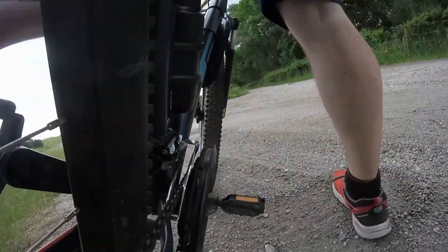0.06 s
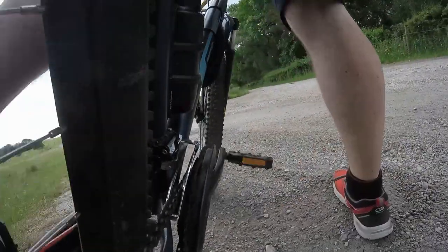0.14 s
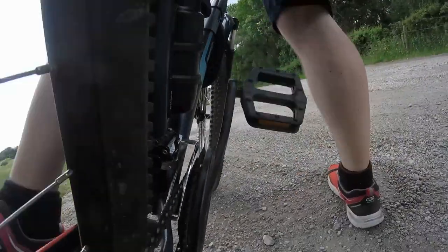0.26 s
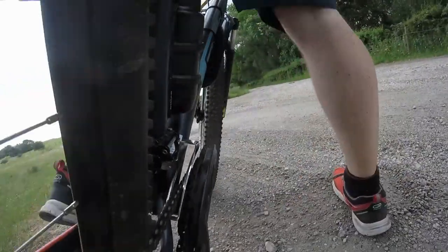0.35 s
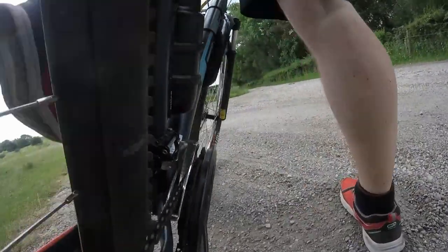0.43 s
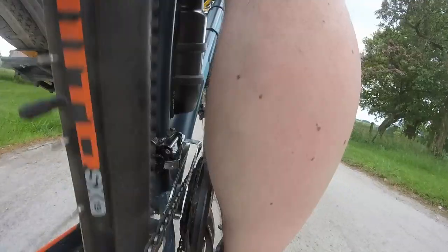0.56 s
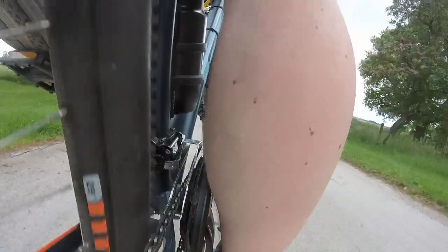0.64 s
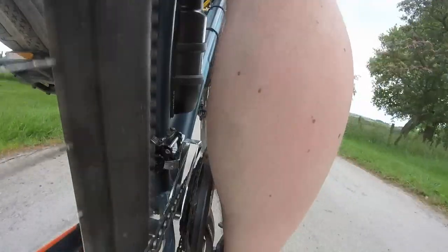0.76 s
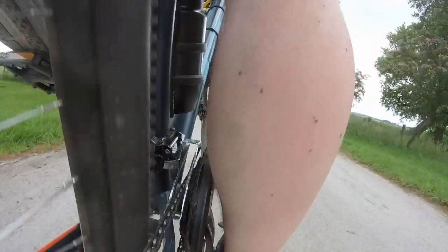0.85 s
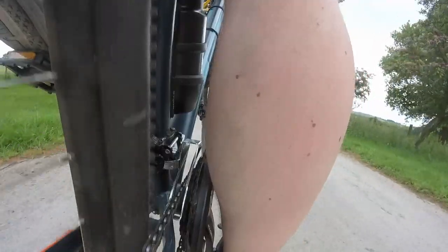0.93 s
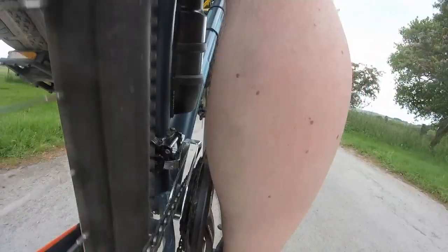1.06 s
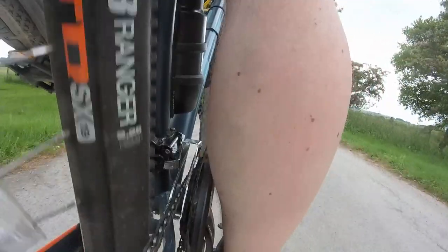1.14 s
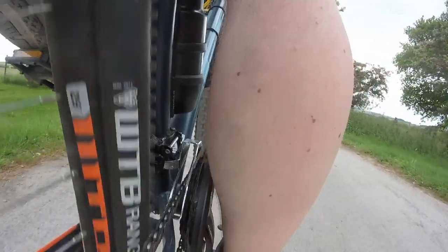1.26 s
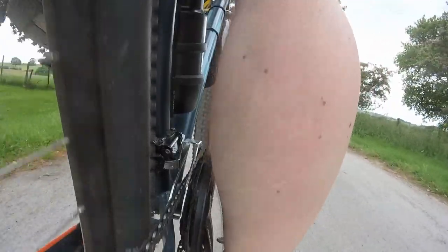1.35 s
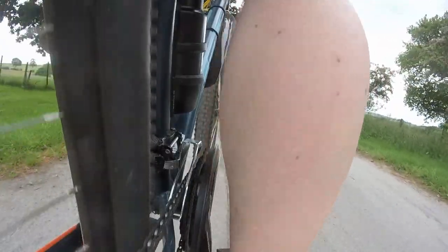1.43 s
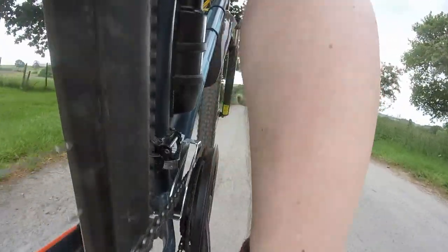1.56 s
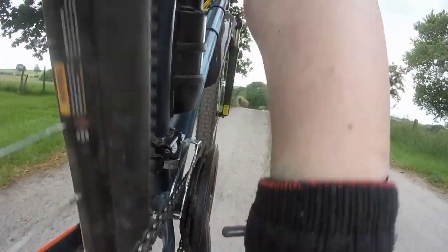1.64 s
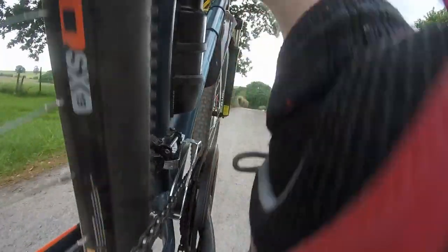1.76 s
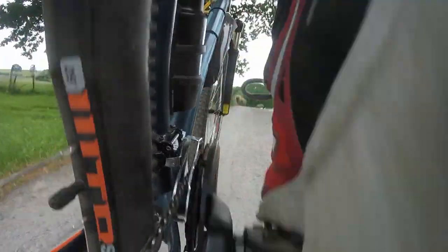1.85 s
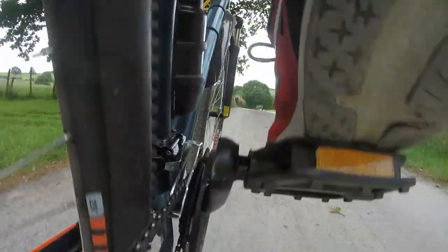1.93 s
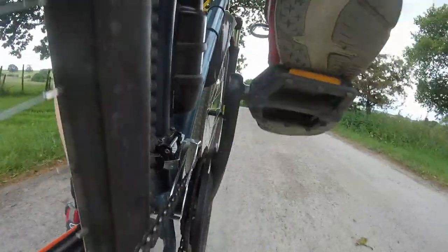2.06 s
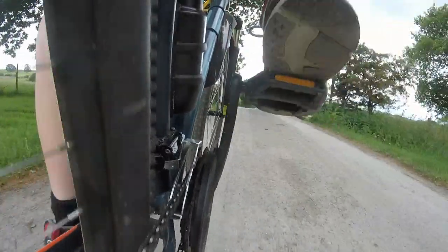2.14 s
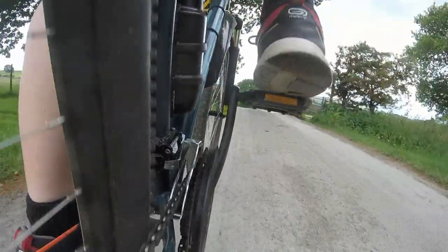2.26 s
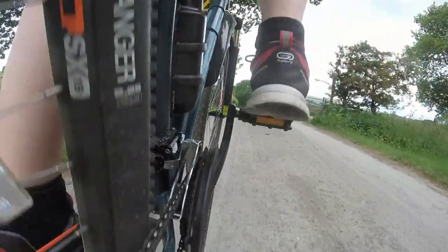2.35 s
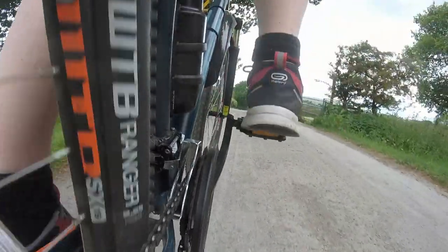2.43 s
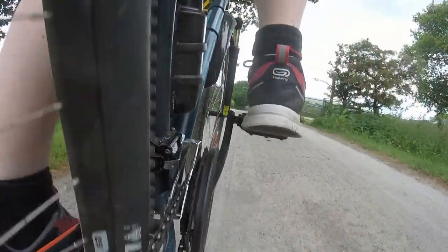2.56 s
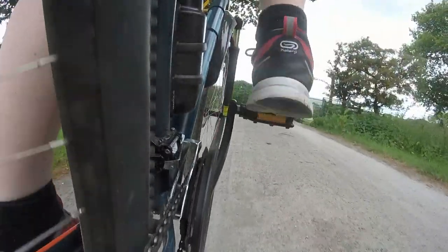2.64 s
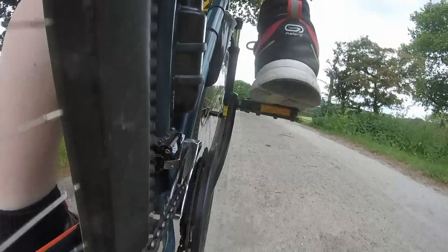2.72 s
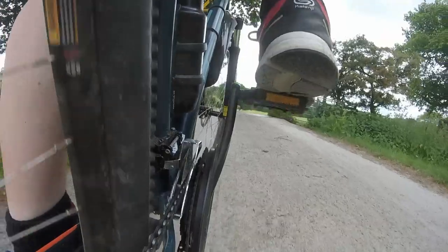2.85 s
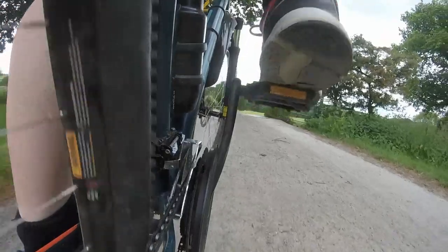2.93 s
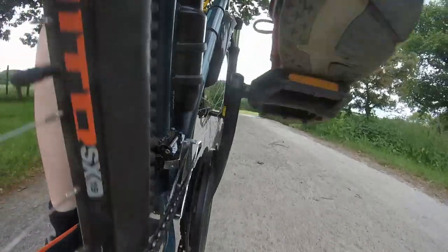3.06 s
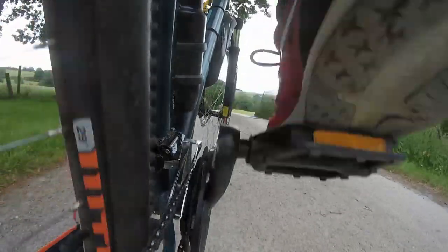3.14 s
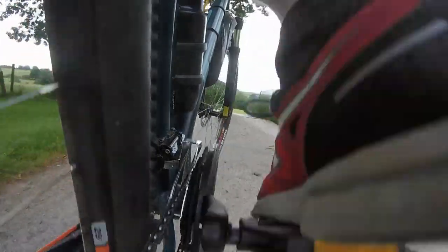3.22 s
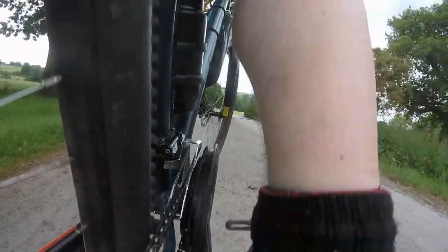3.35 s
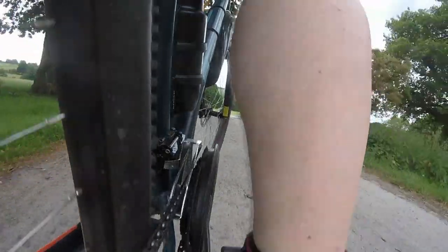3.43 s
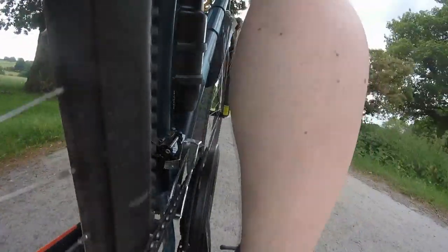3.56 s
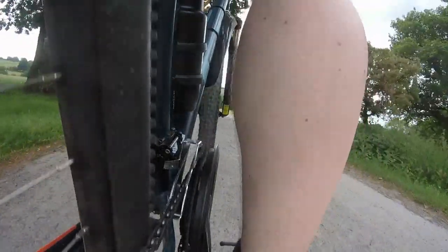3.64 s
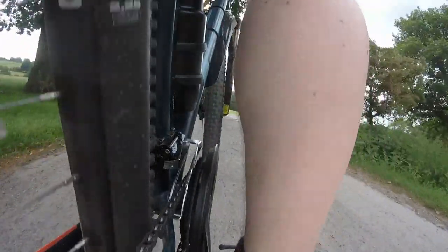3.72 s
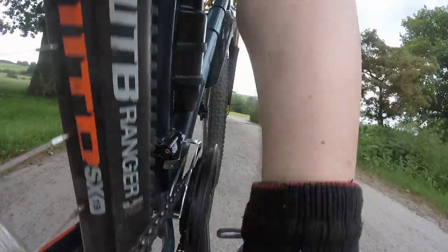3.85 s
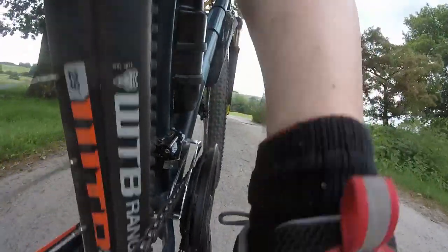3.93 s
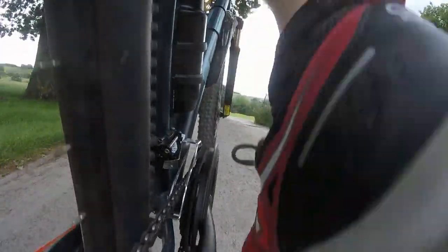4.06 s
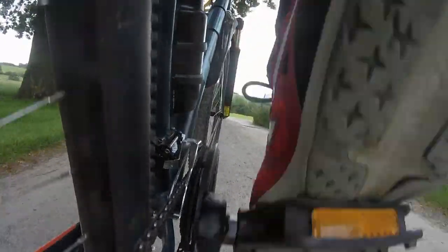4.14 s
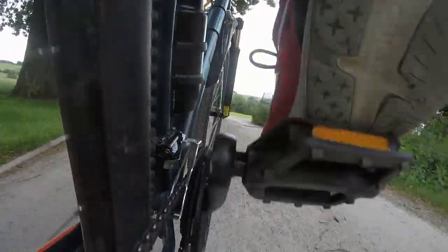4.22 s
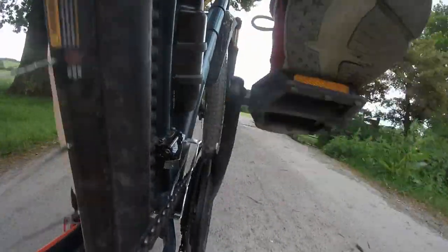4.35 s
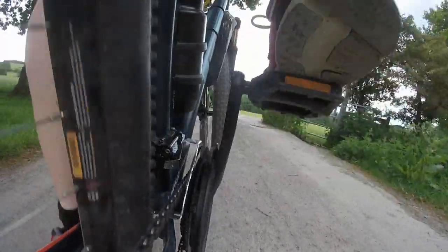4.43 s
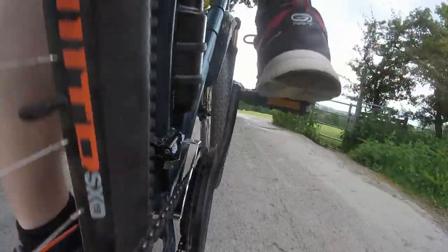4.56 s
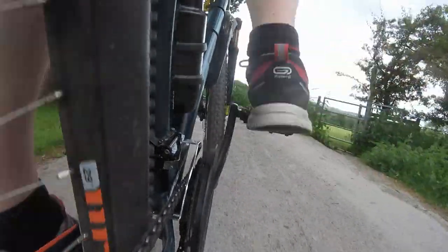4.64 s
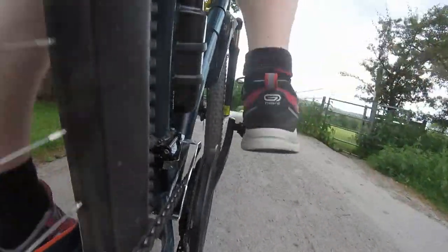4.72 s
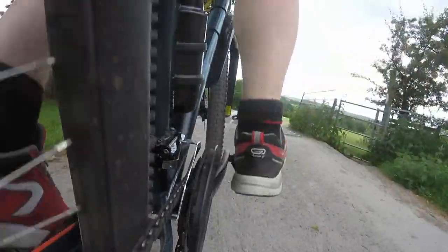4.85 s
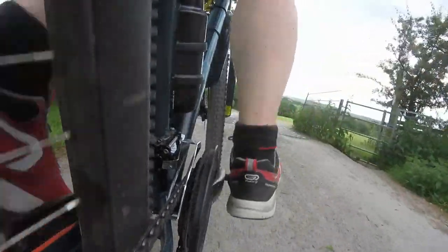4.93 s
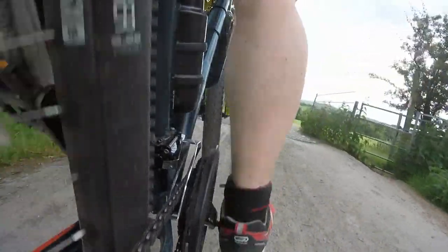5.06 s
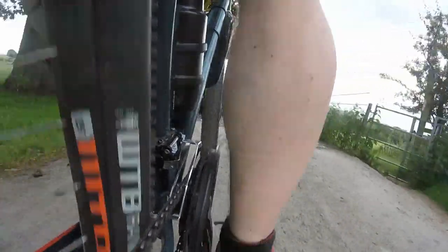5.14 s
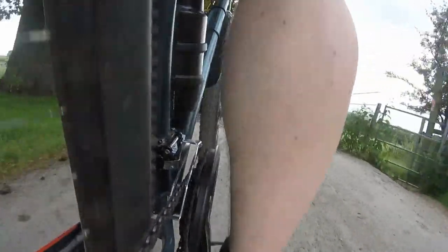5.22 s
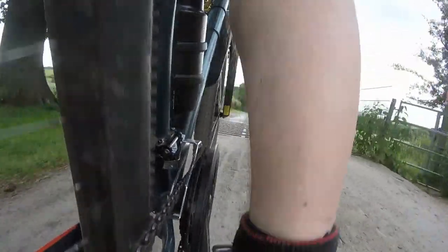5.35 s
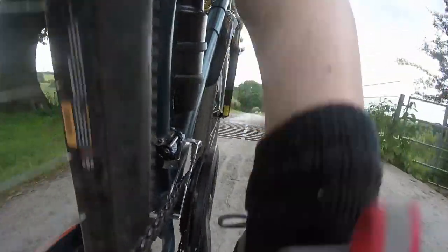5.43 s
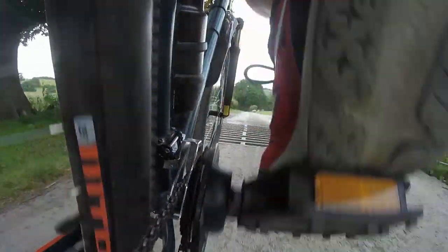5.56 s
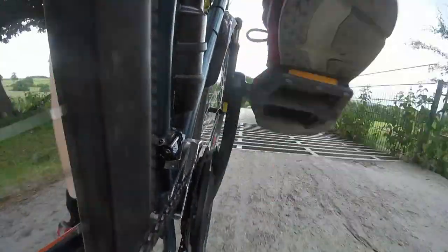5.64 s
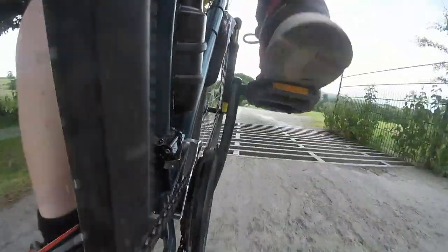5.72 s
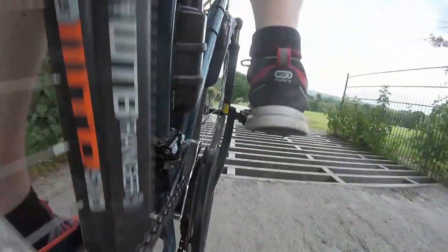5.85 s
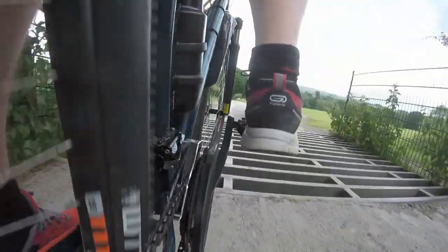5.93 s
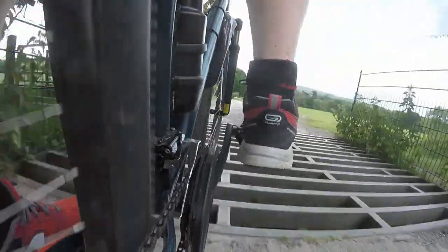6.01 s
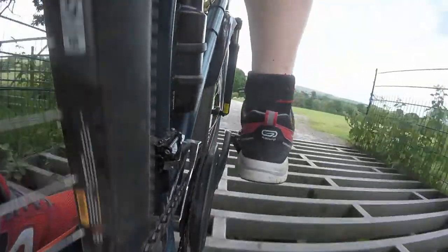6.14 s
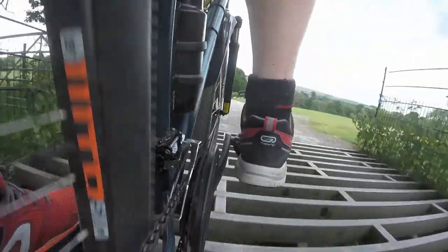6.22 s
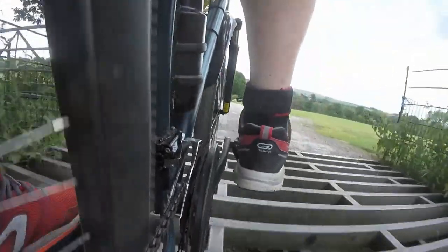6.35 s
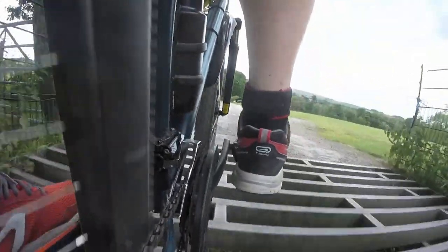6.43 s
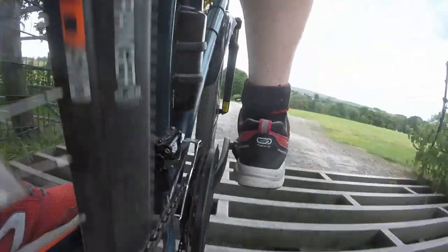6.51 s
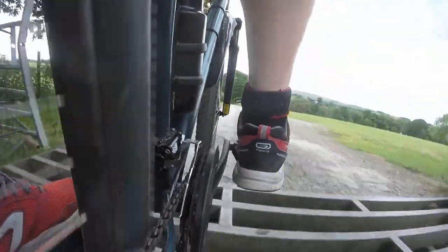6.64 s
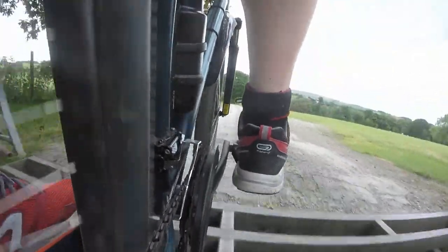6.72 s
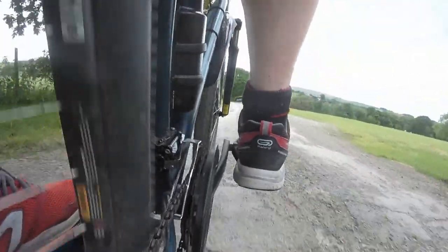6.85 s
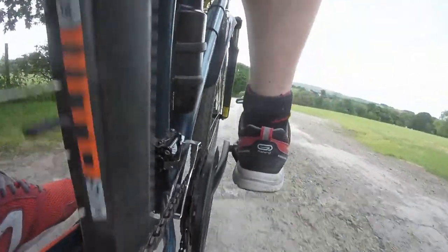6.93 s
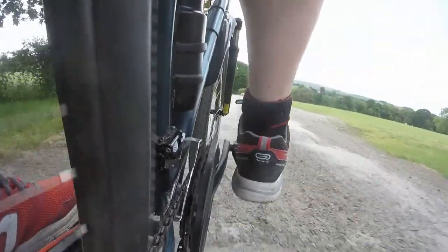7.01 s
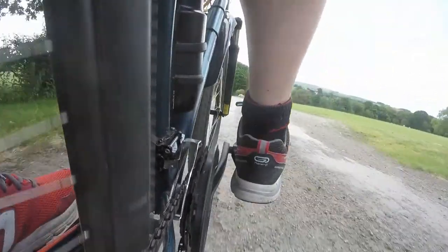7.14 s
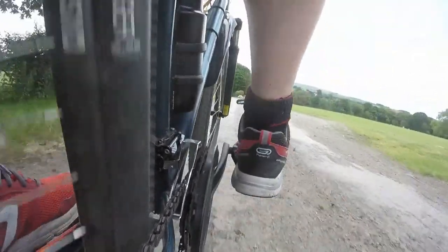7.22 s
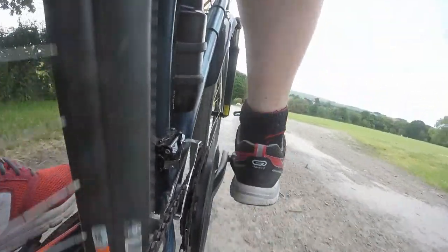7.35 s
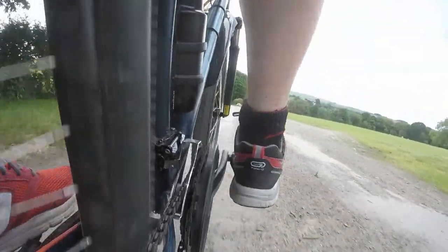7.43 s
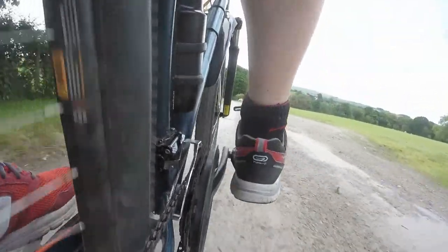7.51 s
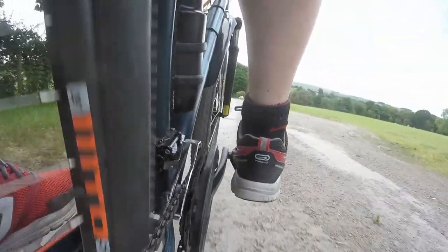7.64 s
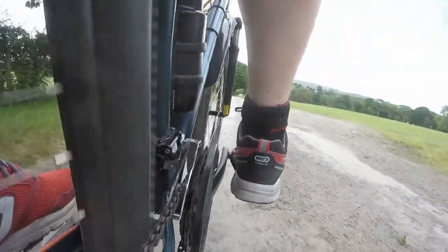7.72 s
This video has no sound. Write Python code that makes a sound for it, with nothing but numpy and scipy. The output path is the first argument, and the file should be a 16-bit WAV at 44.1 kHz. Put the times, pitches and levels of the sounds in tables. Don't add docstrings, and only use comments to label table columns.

```python
import sys
import numpy as np
from scipy import signal
from scipy.fft import rfft, irfft, next_fast_len
from scipy.io import wavfile
from scipy.ndimage import uniform_filter1d

SR = 44100
rng = np.random.default_rng(int(sys.argv[2]) if len(sys.argv) > 2 else 0)


def to_linear_factor(level_db):
    exponent = np.asarray(level_db, float) / 20
    return 10 ** exponent


def int16_out(signal):
    q = np.round(np.clip(np.atleast_2d(signal).T, -1, 1) * 32767)
    wavfile.write(sys.argv[1], SR, q.astype(np.int16))


N = 343098


def evened(x):
    return x / np.sqrt(np.mean(x ** 2) + 1e-20)


def add(mix, s, sound):
    part = mix[round(s * SR):][:len(sound)]
    part += sound[:len(part)]


def coloured(x, points):
    size = next_fast_len(N + 4096)
    hz, db = np.transpose(points)
    bins_hz = np.fft.rfftfreq(size, 1 / SR)
    gain = to_linear_factor(np.interp(np.log(bins_hz + 1), np.log(hz), db, -90, -90))
    return irfft(rfft(x, size) * gain, size)[:N]


def resonate(x, modes):
    out = 0
    for k, (hz, width, db) in enumerate(modes):
        r = np.exp(-np.pi * width / SR)
        poles = [1, -2 * r * np.cos(2 * np.pi * hz / SR), r * r]
        out = out + (-1) ** k * to_linear_factor(db) * signal.lfilter([1 - r, 0, r - 1], poles, x)
    return out


def bumps(per_s, uneven_db, long_s):
    size = to_linear_factor(uneven_db * np.minimum(rng.exponential(1, N), 4))
    jolts = size * (rng.random(N) < per_s / SR)
    power = signal.lfilter([1], [1, -np.exp(-2 / (long_s * SR))], jolts ** 2)
    return np.sqrt(evened(abs(power)))


# (time [s], rocking of the mount [dB], roll of the wheels [dB])
RIDE = [(0.0, -72, -74.5), (0.5, -69.5, -67), (0.62, -51.5, -64.5), (1.2, -52, -66), (1.55, -55.5, -64.5),
        (1.75, -55, -60), (2.15, -57, -63.5), (3.1, -53.5, -66.5), (3.5, -61, -57.5), (3.75, -65.5, -68),
        (4.35, -51, -62), (4.7, -54, -62), (5.1, -46, -55), (5.65, -56.5, -58), (6.058, -52.5, -57.5),
        (6.078, -51.5, -54), (6.9, -50, -53), (7.35, -60, -57.5)]
# (time [s], length [s], rocking [dB], roll [dB])
ROUGH_PATCHES = [(0.136, 0.12, 7, 3.5), (0.332, 0.1, -3, 6), (0.945, 0.11, 2.5, -2), (1.982, 0.12, 11, 1.5),
                 (2.678, 0.17, 7.5, 0), (3.548, 0.11, 3.5, 3), (4.185, 0.1, 3, 4), (4.42, 0.16, 3, 0),
                 (4.93, 0.29, -1, -0.5), (3.414, 0.16, 4.5, -1), (5.15, 0.22, 2.5, 2),
                 (5.553, 0.143, 1.5, 3), (5.696, 0.16, 6.5, 5), (6.492, 0.063, 6.5, 4),
                 (6.842, 0.078, 0, 5.5), (7.138, 0.16, 2, 3), (7.414, 0.32, 4, 2.5)]


def road(rock_share, roll_share, level_db, coast_db=0):
    t = np.arange(N) / SR
    s, rock_db, roll_db = np.transpose(RIDE)
    rock = np.interp(t, s, rock_db + 55)
    roll = np.interp(t, s, roll_db + 62)
    for start, length, more_rock_db, more_roll_db in ROUGH_PATCHES:
        shape = signal.windows.tukey(round(length * SR), .25)
        add(rock, start, more_rock_db * shape)
        add(roll, start, more_roll_db * shape)
    coasting = np.clip((t - 6.07) / 0.0081, 0, 1)
    return to_linear_factor(rock_share * rock + roll_share * roll + level_db + coast_db * coasting)


# (frequency [Hz], density [dB per Hz])
MOUNT_SPECTRUM = [(8.8, -36), (15, -1), (48, -0.5), (130, -7), (200, -30), (260, -27.5), (440, -120)]


def mount_shake():
    drive = (.5 + bumps(12, 2.6, 0.057)) * rng.standard_normal(N)
    return road(0.96, 0.001, -52.5) * evened(coloured(drive, MOUNT_SPECTRUM))


# (time [s], peak [dB], swing [Hz], negative swings down first)
WHEEL_HITS = [(0.682, -43, 184), (0.687, -45, 37), (1.989, -27, -42), (2.053, -31.5, 68),
              (2.724, -31.5, 38.5), (4.182, -37, 55.5), (4.673, -37.5, 54), (4.751, -35, 53.5),
              (4.943, -37, 35.5), (4.951, -39, 44), (5.722, -36, 86.5), (6.081, -31.5, 63.5),
              (6.4807, -19.5, 163), (7.132, -27, -170), (5.8, -36.5, 265), (6.606, -25, -190),
              (6.875, -28, 195), (4.966, -32, -62), (.712, -36, 55)]


def thumps():
    out, t = np.zeros(N), np.arange(9000) / SR
    for s, db, hz in WHEEL_HITS:
        swing = np.sin(2 * np.pi * hz * t) * np.exp(-t * abs(hz) / 4.1)
        add(out, s, to_linear_factor(db - 8.5) * swing)
    return out


def mount_sag():
    out, t = np.zeros(N), np.arange(9000) / SR
    hz = 70 + (360 - 70) * np.exp(-t / 0.034)
    swing = np.sin(2 * np.pi * np.cumsum(hz) / SR)
    add(out, 3.95, to_linear_factor(-51.5) * swing * np.exp(-(t / .08) ** 2))
    return out


# (frequency [Hz], width [Hz], level [dB])
TYRE_MODES = [(152, 91, -4.5), (210.3, 40.7, 1), (235.6, 41, -3), (330.6, 91, -6.5), (421, 510, -17)]


def tyre():
    drive = (0.82 + bumps(60, 3.5, 0.01)) * rng.standard_normal(N)
    carcass = resonate(drive, [(199.4, 250, 0)])
    return road(0.64, 0.39, -58.5, coast_db=8.5) * evened(resonate(carcass, TYRE_MODES))


# (frequency [Hz], width [Hz], level [dB])
TUBE_MODES = [(437.5, 29.6, 5), (550, 74, -1.5), (658, 57, 2), (734, 17, 3), (825, 91, -3),
              (989.5, 77.5, -2), (1124, 24, -6), (1245, 67, -7), (1615, 60, -15.5), (2126, 1030, -23),
              (2530, 1060, -23.5), (3140, 370, -20)]


def frame_buzz():
    drive = (0.59 + bumps(90, 3.3, 0.00081)) * rng.standard_normal(N)
    through_fork = resonate(drive, [(900, 1820, 0)])
    return road(.001, 1.213, -63.5) * evened(resonate(through_fork, TUBE_MODES))


# (time [s], peak [dB], centre [Hz], contact [s])
FRAME_KNOCKS = [(.017, -52, 1330, 0.0026), (.150, -51.5, 780, 0.0056), (.725, -46.5, 1130, 0.015),
                (1.983, -46, 1230, 0.02), (4.359, -45, 1270, 0.014), (4.791, -39, 1470, .0052),
                (4.905, -39.5, 1030, 0.0064), (5.062, -39, 1100, 0.0033), (5.264, -42.5, 1510, 0.015),
                (5.625, -39, 900, 0.005), (5.711, -42.5, 900, 0.0062), (6.076, -37.5, 900, 0.0093),
                (6.479, -38.5, 1130, 0.022), (6.878, -39, 1290, 0.013), (6.911, -34, 800, 0.004),
                (7.040, -36, 800, 0.0078), (7.215, -43.5, 800, 0.004), (7.463, -37, 1280, 0.004)]
# (time [s], peak [dB], centre [Hz])
FRAME_TAPS = [(0.816, -52.5, 2200), (1.3, -59, 2500), (1.8, -65, 2800), (2.671, -41.5, 1140),
              (3.018, -47, 2300), (3.524, -45, 2300), (3.676, -49.5, 2100), (4.159, -53, 3700),
              (4.235, -43.5, 1970), (4.242, -45.5, 2300), (4.339, -51.5, 2780), (4.77, -45.5, 2000),
              (4.866, -45, 2240), (5.345, -42.5, 2450), (3.884, -55, 1000), (3.905, -55.5, 1140),
              (3.75, -59, 1440), (3.617, -48, 1000), (4.092, -57, 1100), (2.5, -58, 3100),
              (6.0103, -47.5, 1950), (5.393, -52, 2400), (5.4745, -55, 2400), (5.6675, -56, 2600),
              (6.5, -54, 2800), (5.152, -56, 2800), (5.27, -43, 2350), (6.5, -47, 3100), (6.1, -46, 2000),
              (6.481, -44, 4100), (5.8, -49, 3100), (7.608, -41, 2100), (.782, -55, 1100), (.49, -59, 1030)]


def frame_blows():
    out, t = np.zeros(N), np.arange(6000) / SR
    hits = [(s, db, hz, 0.0018, 0.24) for s, db, hz in FRAME_TAPS]
    hits += [(*knock, 1) for knock in FRAME_KNOCKS]
    for s, db, hz, contact, octaves in hits:
        blow = rng.standard_normal(len(t)) * np.exp(-t / contact)
        blow[0] = 5.5
        struck = []
        for mode_hz, width, level in TUBE_MODES:
            away = np.log2(mode_hz / hz) / octaves
            struck.append((mode_hz, width, 0.86 * level - 1.47 * away ** 2))
        ring = resonate(resonate(blow, [(hz, 1.84 * hz, 0)]), struck)
        add(out, s, to_linear_factor(db) * ring / abs(ring).max())
    return out


# (time [s], peak [dB], rise [s], free ring [s])
HARD_CLANKS = [
    (1.6259, -25, 0.0028, 0.01402),
    (1.762, -28, 0.0017, 0.012),
    (3.9418, -25, 0.0011, 0.01178),
    (1.8366, -30, 0.00054, 0.00302),
]
# (frequency [Hz], level [dB], t60 [s])
CLANK_MODES = [
    [(691, 1.0, 0.11), (835, 0.5, 0.04), (970, -10.5, 0.072), (1203, 2.5, 0.028), (1590, -4, 0.025), (2128, -23, 0.066)] + [(602, -0.5, 0.059), (287, -18.0, 0.14)],
    [(845, -2.5, 0.14), (983, -0.5, 0.071), (1246, 4.5, 0.036), (1553, 9, 0.0087), (2080, 1, 0.017), (2456, 0, 0.015), (3150, -17, 0.02), (4630, 2.5, 0.011)],
    [(684, 9.0, 0.16), (1124, 19.0, 0.018), (1640, 2.0, 0.064), (2116, 3.5, 0.031), (2560, -7.0, 0.069), (3560, -22, 0.037)] + [(855, 10.5, 0.11), (299, -7, 0.26), (520, -14, 0.5)],
    [(1840, 1.5, 0.0084), (2520, -1, 0.0075), (3220, -3.5, 0.0065), (944, -11, 0.04), (1250, -12.5, 0.026)],
]


def clanks():
    out, t = np.zeros(N), np.arange(9000) / SR
    for (s, db, rise, free), modes in zip(HARD_CLANKS, CLANK_MODES):
        ring = sum(to_linear_factor(level - 60 * t / t60) * np.sin(2 * np.pi * hz * t) for hz, level, t60 in modes)
        ring *= 1 - np.exp(-(t / rise) ** 2)
        add(ring, 0.45 * free, 0.29 * ring.copy())
        ring *= 1.1 + 0.22 * np.exp(-(t / free) ** 4)
        loose = 0.12 + 0.42 * np.minimum(t / (2 * free), 1)
        chatter = evened(uniform_filter1d(rng.standard_normal(len(t)), 90))
        ring *= 1 - .5 * loose + loose * chatter
        add(out, s, to_linear_factor(db) * ring / abs(ring).max())
    return out


# (time [s], teeth passed)
FREEWHEEL_RUNS = [
    [(.5432, 0), (.7826, 3), (1.036, 6), (1.2174, 8), (1.392, 10)],
    [(2.705, 0), (2.8781, 3), (3.0572, 6), (3.2058, 9), (3.3166, 12), (3.4209, 15), (3.5211, 18),
     (3.6339, 21)],
]
# (peak [dB], body under it [dB], sheen under it [dB])
RUN_TICKS = [
    (-51, 1, -9),
    (-55.5, -20, -5),
]


def freewheel_ticks():
    rows = []
    for run, tick in zip(FREEWHEEL_RUNS, RUN_TICKS):
        s, passed = np.transpose(run)
        curve = np.polyfit(passed, s, len(s) - 1)
        for at in np.polyval(curve, np.arange(passed[-1] + 1)):
            rows.append((at, *(tick + 1.76 * rng.standard_normal(3))))
    return rows


# (time [s], peak [dB], body under it [dB])
STRAY_LINKS = [(0.155, -45, -5), (0.595, -50.5, 9), (0.667, -53, 8), (0.7245, -52, 9), (1.202, -49, 3),
               (1.428, -48, 0), (1.5837, -47.5, 0), (1.635, -58, 4), (1.6854, -45, -15),
               (1.7065, -44.5, -2.5), (1.762, -52.5, 27), (1.8372, -51, -4), (2.6717, -44, -5),
               (2.8574, -50, 5.5), (3.6154, -44, -17), (3.9478, -36.5, 9), (4.19, -56, 9),
               (4.3605, -40.5, 7), (4.6195, -48, 7), (4.656, -52.5, 18), (4.791, -57, 25.5),
               (4.8356, -56.5, 16), (4.926, -47.5, 12.5), (5.196, -51.5, 21.5), (5.09, -55.5, 19.5),
               (5.2304, -26, -4), (5.2636, -43, 9.5), (5.321, -37, -11), (5.346, -42, 14)]
# (time [s], peak [dB])
STAY_TICKS = [(1.9853, -40), (2.6318, -49), (2.8075, -56), (3.6771, -43), (3.75, -49.5), (4.5108, -49.5),
              (5.2793, -30), (5.5091, -48), (5.8748, -43), (5.959, -42), (5.9738, -38), (5.995, -43.5),
              (5.6, -48), (6.059, -49), (4.8, -49), (4.9079, -52), (3.8, -54), (4.066, -55)]


def link_ticks():
    rows = [(s, db, body_db, -34) for s, db, body_db in STRAY_LINKS]
    return rows + [(s, db, -6, -17) for s, db in STAY_TICKS]


# (time [s],
# peak [dB], body under it [dB], sheen under it [dB])
CHAIN_JOLTS = [(6.0823, -63, -4, -22), (6.1018, -61, 1, -13), (6.1295, -43, -15, -26), (6.1592, -57, 3, -14),
               (6.1901, -46, -8, -26), (6.2131, -60, 2, -10), (6.2455, -45.5, -8, -19.5),
               (6.2724, -55, -5, -18), (6.3014, -49.5, -5, -21), (6.3203, -54, 3, -16),
               (6.3582, -45, -11, -24), (6.3807, -47, -5, -22), (6.417, -44, -12, -25),
               (6.438, -44.5, -7, -30), (6.474, -59, -6, -19), (6.474, -54, 4, -20), (6.4966, -44, -11, -22),
               (6.5313, -53, -11, -22), (6.546, -46, -15, -22), (6.5686, -54, -5, -16),
               (6.588, -48.5, -13, -24), (6.6146, -55, -9, -23), (6.6501, -49, -10, -24),
               (6.686, -49, -8, -30), (6.7034, -59, -6, -23), (6.7287, -47, -13, -25),
               (6.7603, -50, -7, -23), (6.7862, -51, -11, -30), (6.8017, -46, -10, -24),
               (6.8212, -49, 0, -20), (6.8406, -51, -8, -24), (6.8621, -44, -7, -26), (6.879, -44, 2, -21),
               (6.9145, -46, -11, -29),
               (6.9148, -50, -10, -27), (6.9333, -47, -15, -27), (6.9767, -57, -6, -25),
               (6.9986, -59, -8, -21), (7.0131, -50, -15, -27), (7.029, -47, -11, -23),
               (7.05, -47, -12, -27), (7.0819, -49, -9, -21), (7.0989, -52, -7, -23),
               (7.1373, -47, -10, -22), (7.1645, -49.5, -10, -22), (7.1994, -51.5, -1, -18),
               (7.2271, -51, -2, -24), (7.25, -56, -8, -18), (7.277, -52, -10, -21),
               (7.2822, -47.5, -12, -20), (7.3034, -52, -11, -29), (7.3398, -56, -9, -24),
               (7.3678, -58, -8, -24), (7.3842, -56, -13, -22), (7.4172, -58, -1, -24),
               (7.4326, -55, 3, -21), (7.474, -53, -6, -18), (7.473, -47, -7, -22), (7.494, -53, 3, -20),
               (7.5364, -59, -2, -26), (7.5484, -54, -8, -21), (7.5723, -48, -11, -31),
               (7.5893, -47, -7, -25), (7.6037, -49, -3, -26), (7.6367, -49, -4, -21),
               (7.6661, -53, -6, -18), (7.717, -44.5, -9, -22), (7.7657, -52, -7, -24)]
# (time [s], peak [dB], body under it [dB], sheen
# under it [dB])
MORE_JOLTS = [(6.3734, -51, -14, -25), (6.391, -52, -6, -23), (6.424, -50, -9, -28),
              (6.504, -49, -9, -29), (6.511, -51, -10, -21), (6.6034, -56, -8, -24),
              (6.6574, -54, -10, -21), (6.665, -53, -8, -26), (6.7134, -51, -16, -28),
              (6.7434, -50, -8, -26), (6.9264, -46, -14, -27), (6.9414, -49, -13, -23),
              (7.0437, -48, -12, -24), (7.0574, -52, -9, -31), (7.0654, -51, -10, -25),
              (7.1164, -50, -10, -24), (7.1544, -49, -14, -25), (7.17, -51, -8, -20),
              (7.2124, -52, -7, -24), (7.2944, -51, -11, -24), (7.3841, -54, -13, -22),
              (7.4444, -55, 1, -18), (7.5144, -53, -6, -20), (7.6174, -53, -1, -21),
              (7.6464, -53, -5, -19), (7.6794, -56, 1, -15), (7.7224, -52, -10, -20),
              (7.7714, -52, -13, -24)]


def jolted_ticks():
    jolts = CHAIN_JOLTS
    jolts = jolts + [(s, db - 1.5, body_db, sheen_db) for s, db, body_db, sheen_db in MORE_JOLTS]
    return [(s + .001, db + 10, body_db + 4, sheen_db + 3) for s, db, body_db, sheen_db in jolts]


def snap(power, s, levels_db):
    t = np.arange(600) / SR
    shape = (1 - np.exp(-(t / .0011) ** 2)) * (3 * np.exp(-t / .0008) + .03 * np.exp(-t / .003))
    for band, level_db in zip(power, levels_db):
        add(band, s, to_linear_factor(2 * level_db) * shape)


def tick_contacts(power):
    pawl = np.zeros(N)
    for s, db, body_db, sheen_db in freewheel_ticks() + link_ticks() + jolted_ticks():
        snap(power, s - .0008, (db + body_db - 15, db - 13.5, db + sheen_db - 2))
        add(pawl, s, to_linear_factor(np.array([db + sheen_db + 43])))
    return pawl


# (time [s], peak [dB], ring against it [dB])
SKIPPED_TEETH = [(2.0104, -46, -17), (2.0228, -50, -3), (2.0374, -58, -14), (2.0514, -47.5, -1.5),
                 (2.061, -56, -10), (2.0787, -52, -5), (2.0914, -55, -14), (2.1031, -52, -4.5),
                 (2.1154, -58, -14), (2.1308, -46, -7), (2.1575, -51, -8.5), (2.1829, -54, -11),
                 (2.2089, -54, -7), (2.2353, -56.5, -9), (2.2563, -64, -8), (2.2822, -56, -9.5),
                 (2.3057, -59, -12), (2.3236, -57, -12), (2.3295, -57.5, -7), (2.3815, -63, -9),
                 (2.4279, -59.5, -9), (2.4548, -61, -22), (2.482, -63, -9)]


def skipping_contacts(power):
    cog = np.zeros(N)
    for s, db, ring_db in SKIPPED_TEETH:
        s, db, ring_db = s + .001, db + 3.5, ring_db + 3.5
        snap(power, s - .0009, (db - 13, db + ring_db, db + ring_db - 11))
        add(cog, s, to_linear_factor(np.array([db + 25.5])))
    return cog


# (time [s], length [s], body [dB], ring [dB], sheen [dB])
CHAIN_SLAPS = [(0.147, 0.026, -76, -70, -99), (0.332, 0.089, -105, -93, -81),
               (1.627, 0.025, -133, -59.5, -63), (1.983, 0.022, -54, -53.5, -53),
               (3.944, 0.062, -74, -70, -70), (5.257, 0.085, -68, -74, -91),
               (5.508, 0.0173, -73, -61.5, -76), (6.374, 0.16, -65, -93, -96),
               (6.453, 0.17, -60.5, -79, -90), (6.67, 0.12, -63.5, -73, -86), (6.78, 0.2, -65, -81, -90),
               (6.876, 0.022, -51, -58.5, -76), (7, 0.19, -65.5, -75, -86), (7.269, 0.042, -67, -69, -74),
               (6.92, 0.033, -78, -70, -78), (7.315, 0.043, -70, -82, -89), (7.383, 0.019, -69, -67, -78),
               (7.431, 0.11, -55.5, -71.5, -82), (7.593, 0.026, -58, -84, -84),
               (5.14, 0.055, -76, -91, -94), (7.528, 0.164, -58.5, -73, -84),
               (7.715, 0.11, -62.5, -69, -80)]


def slap_contacts(power):
    rasp = .4 + uniform_filter1d(bumps(130, 3.2, .0016), 30)
    for s, length, *levels_db in CHAIN_SLAPS:
        grit = rasp[round(s * SR):][:round(length * SR)] ** 2
        solid = np.exp(-length / 0.021)
        grit = solid + (1 - solid) * grit / grit.mean()
        shape = signal.windows.tukey(len(grit), .3) * grit
        for band, level_db in zip(power, levels_db):
            add(band, s, to_linear_factor(2 * level_db) * shape)


def rattle_contacts(power):
    links = uniform_filter1d(bumps(130, 3.9, 0.00067), 45)
    gravel = bumps(450, 2.5, 0.0017)
    rattle = road(0.12, 0.93, -78, coast_db=-4.5)
    level = to_linear_factor(np.array([[-1.5], [-3.0], [-14.0]]))
    steady = np.array([[.6], [.35], [.2]])
    loose = (rattle * level * (steady + 1.15 * links)) ** 2
    loose[0] += (1.02 * rattle * gravel) ** 2
    drift = uniform_filter1d(rng.standard_normal((3, N)), 700)
    clumps = evened(uniform_filter1d(drift, 700))
    power += loose * to_linear_factor(5.5 * np.tanh(clumps))


# (frequency [Hz], width [Hz], level [dB])
COG_MODES = [(2300, 380, -1.5), (4120, 120, 3.5), (5130, 150, -5)]


def cog_ring(cog):
    return sum(resonate(cog * rng.uniform(-.4, 1.2, N), [mode]) for mode in COG_MODES)


# (frequency [Hz], width [Hz], level [dB])
PAWL_MODES = [(7180, 90, -4), (8600, 32, -9.5), (10100, 190, -15), (11400, 420, -21), (14100, 69, -40)]


def pawl_ring(pawl):
    return sum(resonate(pawl * rng.uniform(-0.61, 0.25, N), [mode]) for mode in PAWL_MODES)


# (frequency [Hz], density [dB per Hz])
STEEL_SPECTRUM = [(880, 9), (1500, 4), (1640, 3.5), (1790, 0.5), (2070, 1.5), (2780, -0.5), (3540, 2.5),
                  (3870, -1), (5500, -10), (7450, -8.5), (8050, -10), (8790, -6.5), (11000, -20),
                  (13300, -35), (15500, -44)]


def steel_chatter(power):
    out = np.zeros(N)
    bands_hz = ((1200, 4800), (6000, 10200), (11500, 15800))
    for band, edges, order in zip(power, bands_hz, (1, 1, 2)):
        keep = signal.butter(order, edges, "bandpass", fs=SR, output="sos")
        noise = rng.standard_normal(N)
        norm = np.std(coloured(signal.sosfilt(keep, noise), STEEL_SPECTRUM))
        chatter = signal.sosfilt(keep, np.sqrt(band) * noise)
        out += coloured(chatter, STEEL_SPECTRUM) / norm
    return out


def cable_zip():
    out = np.zeros(N)
    scrape = evened(resonate(rng.standard_normal(960), [(13400, 750, 0)]))
    add(out, 1.9835, to_linear_factor(-53) * signal.windows.tukey(960, .3) * scrape)
    return out


def drivetrain():
    power = np.zeros((3, N))
    pawl = tick_contacts(power)
    cog = skipping_contacts(power)
    slap_contacts(power)
    rattle_contacts(power)
    return steel_chatter(power) + cog_ring(cog) + pawl_ring(pawl) + cable_zip()


def hiss():
    return to_linear_factor(-92) * rng.standard_normal(N)


def scene():
    mount = mount_shake() + thumps() + mount_sag()
    frame = frame_buzz() + frame_blows() + clanks()
    return (mount + tyre() + frame + drivetrain() + hiss())[None]


def band_limit(x):
    return signal.sosfilt(signal.butter(12, 15700, fs=SR, output="sos"), x)


def record(dry):
    edge = signal.firwin(255, 15500, window=("kaiser", 8), fs=SR)
    mix = signal.oaconvolve(dry, edge[None], "same")
    return band_limit(mix)


dry = scene()
out = record(dry)
int16_out(out)
```